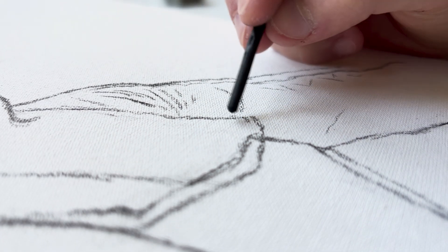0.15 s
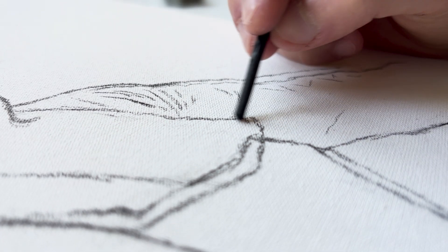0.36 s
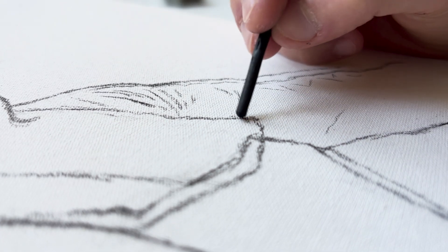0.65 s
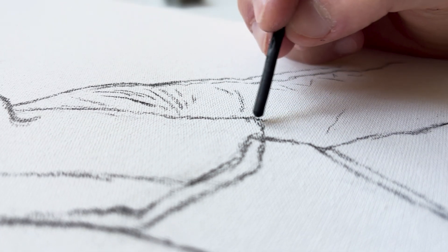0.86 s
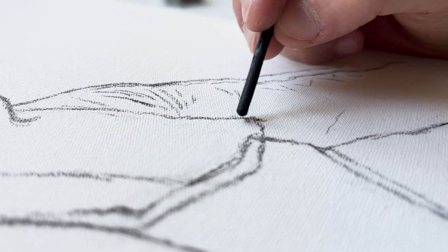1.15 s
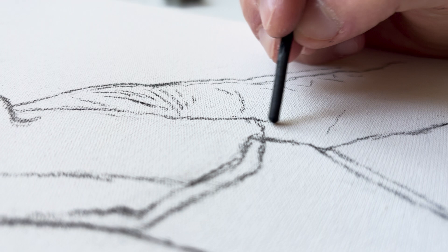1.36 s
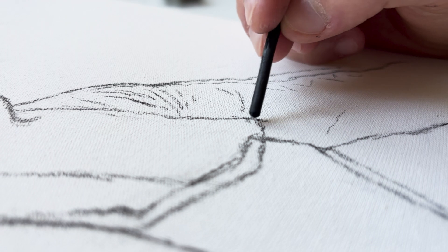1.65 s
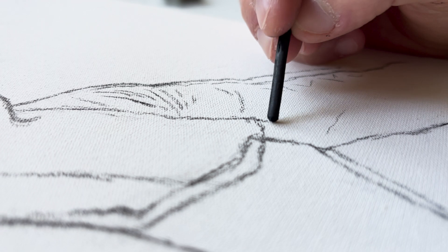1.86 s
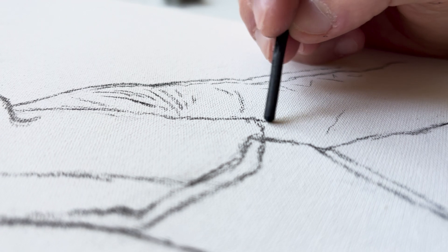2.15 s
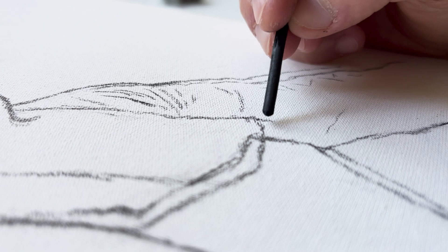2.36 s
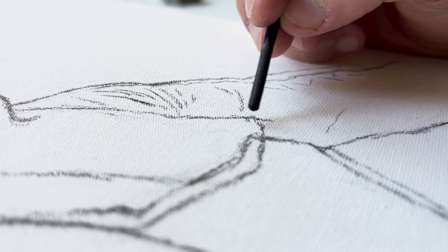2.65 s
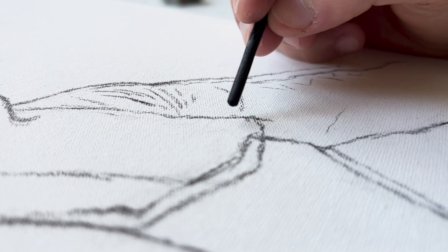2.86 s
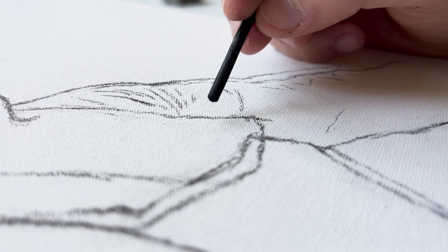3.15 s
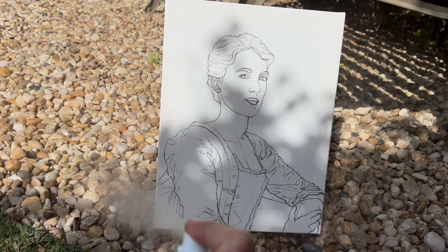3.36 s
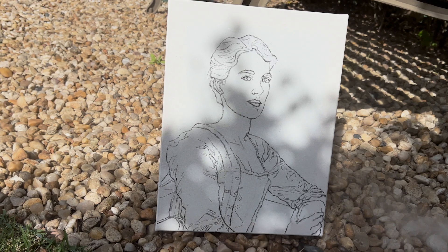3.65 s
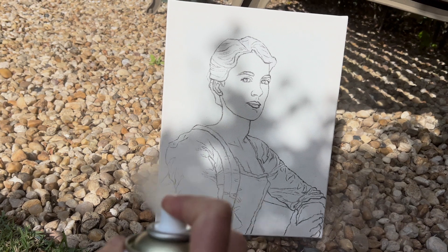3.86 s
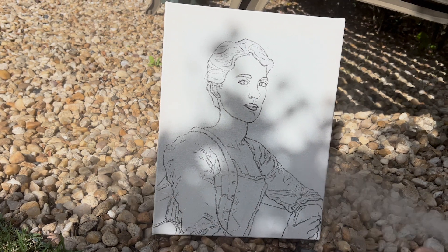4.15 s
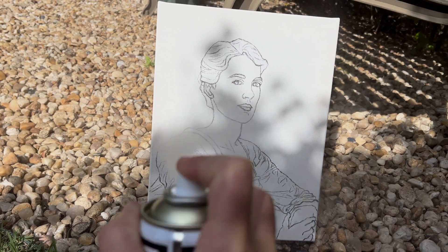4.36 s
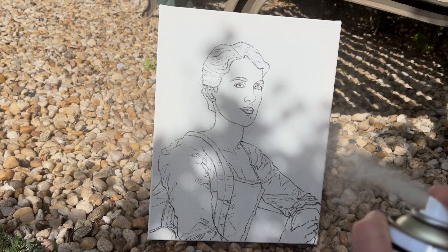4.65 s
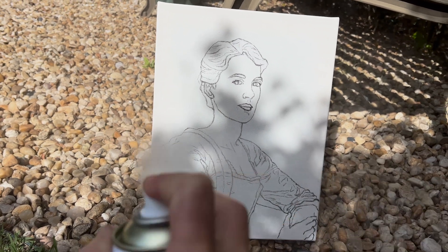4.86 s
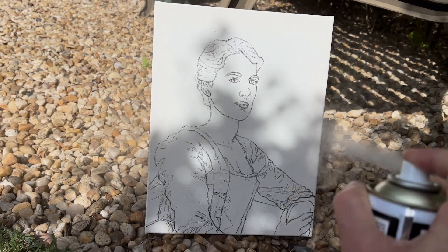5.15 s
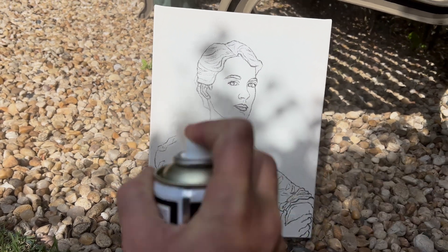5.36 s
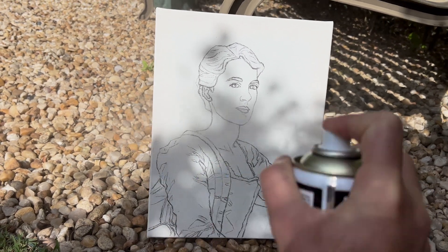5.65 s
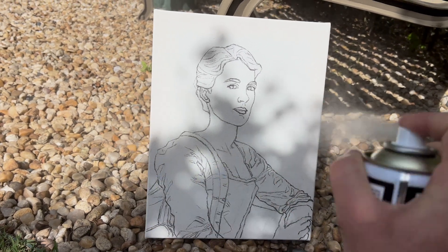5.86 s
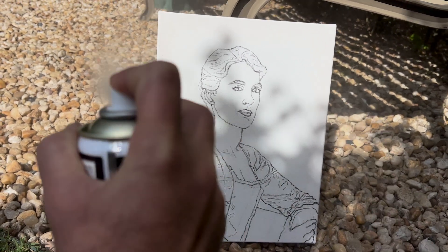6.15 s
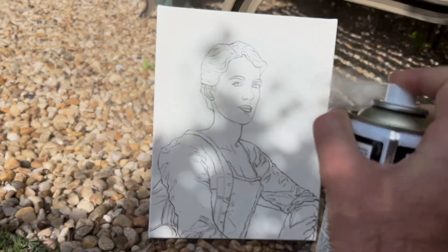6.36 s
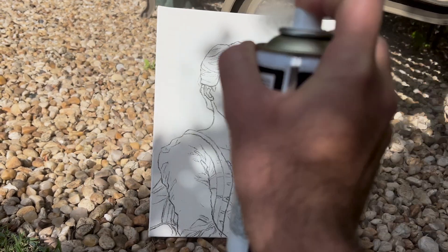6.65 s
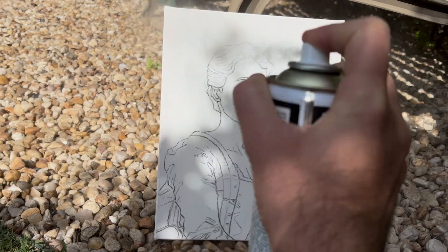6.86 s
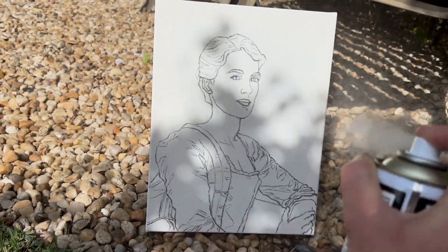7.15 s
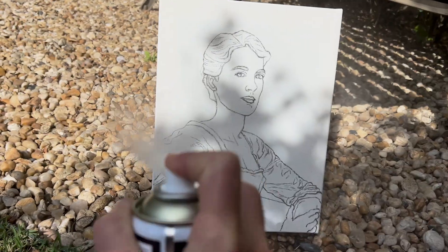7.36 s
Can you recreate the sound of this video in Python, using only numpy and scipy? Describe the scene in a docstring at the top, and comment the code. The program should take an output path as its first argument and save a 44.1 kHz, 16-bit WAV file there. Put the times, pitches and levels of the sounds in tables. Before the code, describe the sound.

From 0 to about 3.1 s we are close to a stretched canvas in a quiet, dull room with a barely audible hum. Charcoal touches at 0.25-0.45 s in quick, gritty little scratches with brittle crumb ticks and soft, low drum-like booms. A longer rub comes at 0.65-0.8 s, then single short taps near 1.35 and 1.83 s and a last pair around 2.15 s; the canvas rings briefly after each. Near-quiet follows, with one tiny tick at 2.5 s. From 3.1 to 3.5 s the room dissolves into a yard with low rumble and faint far drones. An aerosol spray hisses continuously to the end, about 7.6 s, bright and airy, swishing with each sweep roughly twice a second, surging to the left, flashing with crisp sizzle, thinning near 3.6 and 7.05 s, and gradually becoming nearer and louder.

```python
"""Charcoal on canvas, then a spray can

A charcoal stick scratches short strokes on a stretched canvas, which booms like a soft drum, in a quiet room.
The scene dissolves to a yard, where an aerosol can sweeps from side to side with a bright, swishing hiss.
Jet and friction are shaped noise; canvas and crumbs ring as damped tones. The jet's near reflection swishes.
Behind them lie dull room air and a faint hum, then an outdoor rumble with far drones.
"""
import sys
import numpy as np
from scipy import signal
from scipy.fft import rfft, irfft, next_fast_len
from scipy.io import wavfile
from scipy.ndimage import map_coordinates

SR = 44100
rng = np.random.default_rng(int(sys.argv[2]) if len(sys.argv) > 2 else 0)


def put_to_file(sound):
    """Save the sound as 16-bit audio at rate SR, in the file named by the first command-line argument."""
    columns = np.atleast_2d(sound).T  # one column per channel
    safe = np.clip(columns, -1, 1)
    whole_steps = np.round(safe * 32767)
    wavfile.write(sys.argv[1], SR, whole_steps.astype(np.int16))


N = 331632
TIME = np.arange(N) / SR   # s
DISSOLVE_S, DISSOLVE_LENGTH_S = 3.1, .42   # start and length of the change from room to yard
PORT_LAG_MS = .15   # time between the microphone's two ports
# long waves bend round hand and can and are hardly reflected
UNREFLECTED_HZ, UNREFLECTED_DB = (30, 2300), -12


# the can works its way closer: (time [s], level change [dB])
NEARNESS = [(3.4, -2), (4.25, -2), (5.2, 1), (6.3, 1.5), (6.95, 3), (7.2, 3), (7.5, 4.5)]
# the treble beam flashes past: (middle [s], half length [s], gain before each layer takes its share [dB])
FLASHES = [(3.41, .035, -1.5), (3.503, .028, 0), (3.78, .04, 3), (4.017, .055, 3.5), (4.29, .025, 2),
           (4.385, .045, 6), (4.608, .045, 6), (4.907, .07, 4.5), (5.105, .075, 6), (5.41, .035, 6),
           (5.685, .07, 6.3), (6.045, .03, 3.5), (6.374, .08, 5.4), (6.594, .05, 1), (7.09, .04, -3),
           (7.29, .055, 6.5)]
# the arm reaches wide to the right and the jet loses its midrange:
# (middle [s], half length [s], loss [dB])
WIDE_REACHES = [(3.606, 0.097, 6.5), (7.048, 0.081, 7.5)]


def spray():
    """Turbulent jet: rush, hiss, surge, whistle and sizzle, sputtering together as droplets pass."""
    near_db = np.interp(TIME, *np.transpose(NEARNESS))
    leftward, speed = arm(), pace()
    aside, rush_gain_db, hiss_gain_db, surge_db, side_db = swings()
    tremor_db = 1.27 * drift(31)
    aim_db = sum(db * bell(s, half) for s, half, db in FLASHES) + tremor_db
    path_ms = reflection_path()

    body = rush(near_db, aside, rush_gain_db, side_db)
    body = body + hiss(near_db, aim_db, leftward, hiss_gain_db, side_db)
    body = body + from_db(near_db + surge_db) * surge(aside, speed)
    body = moving_dip(body, speed, near_db)
    reach_db = sum(db * bell(s, half) for s, half, db in WIDE_REACHES)
    body = emphasis(body, (1040, 5850), -reach_db)
    body = scattered(body, leftward, strength=.14)

    # the top treble reaches the right channel first
    top = sizzle(near_db, aim_db, aside) + whistle(near_db, aim_db, aside, side_db)
    beam = ports(top, top, -PORT_LAG_MS) + diffuse_sizzle(near_db)

    jet = reflected(body + beam, path_ms, strength=.38)
    jet = restless(jet, patchy_db=1.7, patch_hz=330, patch_s=.11)
    sputter_db = 0.64 * drift(400)
    return jet * from_db(sputter_db)


# colour of the rush: (frequency [Hz], relative level [dB])
RUSH_COLOUR = [(200, 0.5), (450, -8), (800, -5), (1100, 1), (1550, 3), (2050, 0.5), (2400, 4.5),
               (2680, 6.5), (3000, -3.5), (3500, -1), (4500, -0.5), (6500, 4.5), (7200, 2.5), (7900, 8),
               (8400, -4), (9200, -38)]
# how alike left and right are in rush and hiss: (frequency [Hz], likeness [-1 to 1])
JET_LIKENESS = [(450, 0.88), (1150, 0.77), (1800, 0.24), (2700, 1), (3500, 0.29), (4500, 0.46),
                (5600, 0.15), (7500, 0.77), (9000, 0.022)]


def rush(near_db, aside, gain_db, side_db):
    """The jet's broad noise, fuller around 2.3 to 3.5 kHz, comes first on the left when the can is there."""
    ring_hz, ring_db = (2330, 3470), 2.5 - 0.5 * aside
    noise = emphasis(colour(white(), RUSH_COLOUR, JET_LIKENESS), ring_hz, ring_db)
    level_db = -42 + 0.8 * near_db + gain_db
    return from_db(level_db) * ports(*noise, PORT_LAG_MS * aside) * pan(0.74 * side_db)


# colour of the hiss: (frequency [Hz], relative level [dB])
HISS_COLOUR = [(3000, -9.5), (3600, -0.5), (3900, -0.5), (4400, 2), (4850, 6.5), (5250, 3), (5470, 3),
               (5720, 0.5), (6200, 3), (6550, 3.5), (7100, -1), (7900, -9), (8500, 3.5), (9500, -80)]


def hiss(near_db, aim_db, leftward, gain_db, side_db):
    """The nozzle's turbulent hiss strengthens with nearness, with aim and as the arm moves left."""
    noise = colour(white(), HISS_COLOUR, JET_LIKENESS)
    level_db = -46 + near_db + 0.78 * aim_db + 2.5 * leftward + gain_db
    return from_db(level_db) * noise * pan(1.36 * side_db)


# colour of the surging hiss: (frequency [Hz], relative level [dB])
SURGE_COLOUR = [(3000, -11), (3800, -4.5), (4600, 2.5), (5750, 2.5), (6400, -5.5), (7300, -12),
                (7950, -2.5), (8500, -31), (9500, -52)]


def surge(aside, speed):
    """While the can is to the left an extra hiss swells, its pitch dipping as the arm turns."""
    noise = colour(rng.standard_normal(N), SURGE_COLOUR)
    noise = rms_one(swept(noise, 5150 + 750 * speed, width_hz=800, gain_db=5))
    return from_db(-43.5) * aside * noise * pan(13)


def moving_dip(x, speed, near_db):
    """A dip in the jet lies lowest when the arm turns, climbs in mid-sweep and climbs less when near."""
    unsteady_db = 2.5
    climb = speed * from_db(-1.5 * near_db + unsteady_db * drift(9))
    depth_db = -9 + unsteady_db * drift(12)
    return swept(x, 3230 + 610 * climb, width_hz=237, gain_db=depth_db)


# level of the sizzle between flashes, and the share of the nearness swing that it takes
SIZZLE_DB, SIZZLE_FOLLOWS = -31, 0.55
# colour of the sizzle: (frequency [Hz], relative level [dB])
SIZZLE_COLOUR = [(7000, -25), (8400, -10), (9000, -2.5), (10300, -3), (11300, -1), (13000, 0), (13900, -.5),
                 (15600, 2.5), (17000, 1)]


def sizzle(near_db, aim_db, aside):
    """The top treble leaves in a narrow beam, while its lower part spreads wide and flashes less."""
    low_hz, low_db = (9100, 10700), -3.5 * aside - 0.88 * aim_db
    noise = emphasis(colour(rng.standard_normal(N), SIZZLE_COLOUR), low_hz, low_db)
    turned_away_db = 2.5 * aside
    return from_db(SIZZLE_DB + SIZZLE_FOLLOWS * near_db + aim_db - turned_away_db) * noise


# colour of the sizzle from all round: (frequency [Hz], relative level [dB])
DIFFUSE_COLOUR = [(10000, -40), (11300, 0), (15600, 0)]


def diffuse_sizzle(near_db):
    """A little of the sizzle comes back from all round the yard, independent on left and right."""
    return from_db(SIZZLE_DB + SIZZLE_FOLLOWS * near_db - 14) * colour(white(), DIFFUSE_COLOUR)


# the whistling top of the nozzle's cavity: (frequency [Hz], relative level [dB])
WHISTLE_COLOUR = [(10000, -30), (11300, -8), (12000, 0), (12500, -2), (12900, -11), (14000, -30)]


def whistle(near_db, aim_db, aside, side_db):
    """The nozzle's cavity whistles, louder and higher when the can swings to the side."""
    level_db = -45 + 0.65 * near_db + 0.12 * aim_db + 0.58 * side_db
    noise = from_db(level_db) * colour(rng.standard_normal(N), WHISTLE_COLOUR)
    return swept(noise, 11400 + 650 * aside, width_hz=280, gain_db=5)


# the can passes to the left and back: (out [s], back [s], rush gain [dB], hiss gain [dB],
# surge level change [dB], left-right difference before each layer takes its share [dB])
SWINGS = [(3.246, 3.358, -0.5, -5.5, -6, 10), (3.827, 3.967, 1.5, -3.5, -4.5, 4),
          (4.336, 4.5, 0, -13, -4, 8), (4.823, 4.992, -1.5, -8.5, -1.5, 8), (5.336, 5.575, -1.5, -5, -2, 5),
          (5.998, 6.243, 0, -4.5, 0.5, 4.5), (6.696, 6.8, 2, -3, -10, 1), (7.268, 7.402, 2, -16.5, -7, 6.5)]


def swings(edge_s=0.075, rest_pan_db=1.2):
    """While the can is to the left, the jet leans that way and surges."""
    aside = np.array([plateau(out, back, edge_s) for out, back, *_ in SWINGS])
    rush_db, hiss_db, surge_db, pan_db = np.transpose(SWINGS)[-4:] @ aside
    return aside.sum(axis=0), rush_db, hiss_db, surge_db, rest_pan_db + pan_db


# turning points of the arm's sweep: (time [s], position [0 far right to 1 far left])
ARM_TURNS = [(3.3, .6), (3.62, 0), (3.92, .7), (4.15, .15), (4.42, 1), (4.68, .45), (4.93, 1), (5.17, .5),
             (5.46, 1), (5.78, .45), (6.12, 1), (6.45, .7), (6.76, 1), (7.0, .1), (7.37, .95), (7.62, .4)]


def arm():
    """The arm's position, easing into each turning point."""
    s, position = np.transpose(ARM_TURNS)
    steps = np.arange(len(s))
    leg, part = np.divmod(np.interp(TIME, s, steps), 1)
    eased = (1 - np.cos(np.pi * part)) / 2
    return np.interp(leg + eased, steps, position)


def pace():
    """The arm's relative speed: 0 at each turning point, 1 in mid-sweep."""
    s = np.transpose(ARM_TURNS)[0]
    return np.sin(np.pi * np.interp(TIME, s, np.arange(len(s)))) ** 2


def reflection_path():
    """The reflection's extra path [ms] grows as the arm goes left and trembles with the unsteady hand."""
    return 1.85 + .33 * arm() + .015 * drift(11)


def reflected(x, path_ms, strength):
    """A near reflection whose path changes with every sweep: a moving comb that swishes."""
    treble = emphasis(x, UNREFLECTED_HZ, UNREFLECTED_DB)
    return x + strength * np.array([delayed(channel, path_ms) for channel in treble])


def scattered(x, leftward, strength, stretch=0.148, wander_ms=0.013, count=5):
    """Faint echoes off hand, can and ground, other ones on each side, stretch as the arm moves left."""
    out, treble = x.copy(), emphasis(x, UNREFLECTED_HZ, UNREFLECTED_DB)
    for side, paths_ms in enumerate(rng.uniform(.4, 3, (2, count))):
        for path_ms in paths_ms:
            delay_ms = path_ms * (1 + stretch * leftward) + wander_ms * drift(5)
            out[side] += strength * np.interp(TIME - delay_ms / 1000, TIME, treble[side])
    return out


# strokes; where the tip sits picks the modes that boom. The three times are played in rising order.
# (touch [s], hardest [s], lift [s], touch level [relative dB], hardest level [relative dB], unused [dB],
# boom over scratch [relative dB], strongest boom [Hz], fall to either side [dB per octave])
STROKES = [(0.246, 0.273, 0.3, -61, -56, 4, 17.5, 260, 2), (0.307, 0.36, 0.338, -77, -71.5, -3, 38, 121, 3),
           (0.349, 0.383, 0.433, -63, -47, -3, 14, 83.5, 1),
           (0.467, 0.49, 0.487, -62.5, -65, 2, 27.5, 238, 9),
           (0.653, 0.723, 0.815, -61, -53, -6, 11, 200, -0.5),
           (1.329, 1.345, 1.357, -54.5, -52.5, 0, 7.5, 245, 0),
           (1.819, 1.83, 1.864, -60, -53.5, 0, 15, 241, 1),
           (2.115, 2.17, 2.14, -62, -51.5, -2, 12.5, 230, 5),
           (2.172, 2.187, 2.22, -67, -60.5, 0, 30.5, 237, 17)]


def pressures(bite_s=0.0064, release_s=0.029, lift_drop_db=11):
    """Friction of each stroke: it bites quickly, swells and eases off."""
    rows = []
    for touch, hardest, lift, touch_db, hardest_db, *_ in STROKES:
        times = np.sort([touch - bite_s, touch, hardest, lift, lift + release_s])
        levels = from_db([touch_db, hardest_db, hardest_db - lift_drop_db])
        rows.append(np.interp(TIME, times, [0, *levels, 0]))
    return np.array(rows)


# colour of the scratch: (frequency [Hz], relative level [dB])
SCRATCH_COLOUR = [(200, 16.5), (450, -13), (800, 9.5), (1100, -1.5), (1600, 6.5), (2100, 6.5), (2600, 0.5),
                  (3200, -5), (4800, 5), (5900, -0.5), (7000, -6.5), (8000, 3), (8900, -19.5),
                  (11500, -8.5), (15700, -5)]
# how alike left and right are in the scratch: (frequency [Hz], likeness [-1 to 1])
SCRATCH_LIKENESS = [(300, -0.56), (700, 0.99), (2000, 0.99), (5000, -0.75), (8000, 0.5), (11000, 0.11)]


def scratch(pressure, threads_per_s=900, bumps_per_s=90):
    """The tip catches on the weave thread by thread, so its friction noise comes in grains."""
    grain_db, uneven_db = 2 * drift(threads_per_s), 2 * drift(bumps_per_s)
    catches = rms_one(from_db(grain_db + uneven_db))
    friction = colour(white() * catches, SCRATCH_COLOUR, SCRATCH_LIKENESS)
    # the worn tip meets the cloth at ever new angles
    friction = restless(friction, patchy_db=2.2, patch_hz=500, patch_s=.09)
    return from_db(-1) * pressure.sum(axis=0) * friction * pan(5)


# snapping crumbs of charcoal: (time [s], starting level of the tick [relative dB], pitch [Hz])
CRUMBS = [(0.167, -52.5, 5300), (0.254, -42, 1640), (0.296, -52, 4500), (0.343, -46, 3600),
          (0.371, -55, 1710), (0.434, -50, 4800), (0.466, -56, 1500), (0.483, -54, 4800),
          (0.664, -51, 1650), (0.75, -46, 4800), (0.806, -60, 4800), (1.335, -53, 1370),
          (1.355, -40.5, 1500), (1.83, -46, 1730), (2.162, -38.5, 1900), (2.512, -64, 5200)]


def crumbs(t60=0.0029, crack=0.22, crack_cycles=2.5):
    """A snapping crumb makes the stick tick, with a broad crack around the same pitch."""
    out = np.zeros(N)
    age = TIME[:SR // 20]
    for s, db, hz in CRUMBS:
        at = round(s * SR)
        tone = np.sin(2 * np.pi * hz * age)
        burst = rms_one(ring(rng.standard_normal(len(age)), hz, crack_cycles / hz))
        out[at:at + len(age)] += from_db(db - 60 * age / t60) * (tone + crack * burst)
    return out * pan(3)


def studio(x, late, late_t60, early=1.0, early_t60=0.025, wall_hz=5000):
    """Close surfaces colour the sound and the walls add a short, dull tail."""
    t = TIME[:SR // 3]
    response = np.zeros((2, len(t)))
    response[:, 0] = 1   # the direct sound
    wall_dull = np.exp(-2 * np.pi * wall_hz / SR)
    for share, t60, dull in ((early, early_t60, 0), (late, late_t60, wall_dull)):
        echoes = rng.standard_normal(response.shape) * from_db(-60 * t / t60) * (t > .001)
        echoes = echoes / np.linalg.norm(echoes, axis=1, keepdims=True)
        response += share * signal.lfilter([1 - dull], [1, -dull], echoes)
    return signal.fftconvolve(x, response, axes=1)[:, :N]


# modes of the stretched canvas: (frequency [Hz], relative level [dB], time to fall 60 dB [s])
CANVAS_MODES = [(66.34, 0.5, .75), (103, 2, .34), (142.4, 2, .54), (189, -0.5, .32), (209.6, -4.5, .25),
                (254.8, -5.5, .26), (286, -12.5, .17), (314, -7, .14), (368.7, -11.5, .5), (419, -13, .3),
                (565, -20, .12)]
# how alike left and right are in canvas and air: (frequency [Hz], likeness [-1 to 1])
AIR_LIKENESS = [(60, 1), (140, 0.88), (280, 0.62), (550, 0), (3000, 0.11), (15000, 0.043)]


def boom(pressure):
    """Each stroke's pressure shakes the canvas, whose modes ring on after the tip lifts."""
    boom_db, centre_hz, fall_db = np.transpose(STROKES)[-3:]
    flat = [(20, 0), (20000, 0)]
    shake, out = colour(white(), flat, AIR_LIKENESS), 0
    for hz, db, t60 in CANVAS_MODES:
        force = from_db(boom_db - fall_db * np.abs(np.log2(hz / centre_hz))) @ pressure
        # evens out the build-up of long-ringing modes
        unit_gain = np.sqrt(4 * np.log(1000) / (t60 * SR))
        out = out + from_db(db - 7) * unit_gain * ring(force * shake, hz, t60)
    return out * pan(1)


# the tip presses into the cloth or lets it spring back:
# (time [s], strength [relative dB], strongest mode [Hz])
THUMPS = [(0.26, -41, 350), (0.282, -42, 340), (0.303, -42, 145), (0.352, -38, 106), (0.384, -35, 82.6),
          (0.684, -42, 370), (0.75, -46, 200), (0.795, -39, 336), (0.851, -44, 142), (1.357, -42.5, 247),
          (1.876, -40, 282), (1.981, -51.5, 109), (2.151, -40.5, 260), (2.18, -38.5, 240)]


def thumps(contact_hz=600, fall_db_per_octave=9.5):
    """A sudden change of pressure sets the canvas ringing like a soft drum."""
    s, thump_db, centre_hz = np.transpose(THUMPS)
    out = 0
    for k, (hz, db, t60) in enumerate(CANVAS_MODES):
        pushes = np.zeros(N)
        push_db = thump_db + db - fall_db_per_octave * np.abs(np.log2(hz / centre_hz))
        pushes[np.round(s * SR).astype(int)] = from_db(push_db)
        out = out + (-1) ** k * ring(pushes, hz, t60)   # neighbouring modes start in opposite directions
    soft_contact = signal.butter(2, contact_hz, fs=SR, output="sos")
    return signal.sosfilt(soft_contact, out) * pan(1)


# the hand shifts lightly on the cloth:
# (middle [s], half length [s], centre [Hz], width [Hz], peak level [dB])
SHIFTS = [(0.2, 0.055, 5500, 500, -85), (1.77, 0.043, 810, 160, -70), (1.985, 0.088, 5560, 400, -87)]


def shifts():
    """Skin brushing the cloth: faint, narrow swells of friction noise."""
    out = 0
    for middle, half, hz, width_hz, db in SHIFTS:
        rub = rms_one(ring(rng.standard_normal(N), hz, 2 / width_hz))
        out = out + from_db(db) * bell(middle, half) * rub
    return out


# colour of the outdoor rumble: (frequency [Hz], relative level [dB])
YARD_COLOUR = [(20, -36), (30, -14), (38, -3.5), (50, -21), (60, 3), (75, -4), (105, -4.5), (170, -10),
               (260, -14), (400, -22), (800, -21), (3000, -87)]
# far drones, as of traffic: (start [s], end [s], pitch [Hz], level before wavering and panning [dB])
DRONES = [(3.2, 3.91, 152, -52.5), (3.4, 4.7, 211, -52), (4.87, 7.3, 210, -58.5), (3.8, 5.7, 140, -56),
          (4.78, 5.14, 140, -42), (4.43, 4.85, 100, -42), (3.97, 5.4, 53, -47.5), (3.25, 3.97, 105, -50),
          (5.15, 5.75, 67, -50), (6.42, 7.7, 50, -43)]


def yard(fade_s=0.14, rise_db_per_s=0.66):
    """Outdoor rumble whose deepest part slowly grows, with far drones swelling and fading."""
    growth_db = rise_db_per_s * (TIME - DISSOLVE_S)
    rumble = colour(white(), YARD_COLOUR, AIR_LIKENESS)
    out = from_db(-43) * emphasis(rumble, (25, 104), growth_db)
    for start, end, hz, db in DRONES:
        swell = np.clip(np.minimum(TIME - start, end - TIME) / fade_s, 0, 1)
        out = out + from_db(db) * swell * hum(hz, waver_db=3, wander=.65, wander_rate=20)
    return out * pan(0.67)


# colour of the room's air: (frequency [Hz], relative level [dB])
ROOM_COLOUR = [(20, -35), (35, -15), (50, -0.5), (106, -5), (160, -5), (202, -12.5), (330, -14),
               (462, -22.5), (900, -27), (1630, -36), (3500, -51), (5500, -52), (9000, -59.5), (11000, -74),
               (11750, -46), (12500, -56), (15500, -57)]
# tones of the appliance hum: (pitch [Hz], level before wavering [dB])
ROOM_HUM = [(64.6, -67), (102.3, -59), (156.1, -61), (231.5, -75.5), (365, -78), (558, -81)]


def room():
    """Dull indoor air noise with the wavering tones of a faint appliance hum."""
    tones = sum(from_db(db) * hum(hz, waver_db=2.5, wander=.8, wander_rate=18) for hz, db in ROOM_HUM)
    return from_db(-52) * colour(white(), ROOM_COLOUR, AIR_LIKENESS) + tones


def hum(hz, waver_db, wander, wander_rate):
    """A tone that wavers in level and phase; wander is the phase spread in radians."""
    phase = 2 * np.pi * hz * TIME + wander * drift(wander_rate)
    return np.sqrt(2) * np.sin(phase) * from_db(waver_db * drift(5.4))


def from_db(db):
    """Decibels to an amplitude factor."""
    return 10 ** (np.asarray(db) / 20)


def rms_one(x):
    """Scales a sound to an average (rms) strength of 1."""
    return x / np.sqrt(np.mean(x ** 2) + 1e-20)


def white():
    """Two independent rows of white noise."""
    return rng.standard_normal((2, N))


def drift(rate):
    """Smooth chance with spread 1, changing about rate times a second."""
    knots = rng.standard_normal(N // 8)
    return rms_one(np.interp(TIME * rate, np.arange(len(knots)), knots))


def bell(middle, half):
    """A smooth swell of height 1."""
    return np.exp(-((TIME - middle) / half) ** 2)


def plateau(start, end, edge_s):
    """Rises around the start and falls back around the end, reaching 1 if there is time."""
    return np.clip(np.minimum(TIME - start, end - TIME) / edge_s + .5, 0, 1)


def at_hz(points, hz):
    """A spectrum read on a log-frequency axis."""
    knots, values = np.transpose(points)
    return np.interp(np.log(hz + 1e-3), np.log(knots), values)


def colour(x, spectrum, likeness=None):
    """Shapes white sound to rms 1; with a likeness, its two rows become left and right."""
    size = next_fast_len(N)
    hz = np.arange(size // 2 + 1) * SR / size
    bins = rfft(x, size) * from_db(at_hz(spectrum, hz))
    if likeness is not None:
        alike = np.clip(at_hz(likeness, hz), -1, 1)
        mid, side = np.sqrt(1 + alike) * bins[0], np.sqrt(1 - alike) * bins[1]
        bins = np.array([mid + side, mid - side])
    return rms_one(irfft(bins, size)[..., :N])


def emphasis(x, band_hz, db):
    """Raises or lowers one band by a fixed or changing amount."""
    band = signal.sosfiltfilt(signal.butter(2, band_hz, "band", fs=SR, output="sos"), x)
    return x + (from_db(db) - 1) * band


def swept(x, centre_hz, width_hz, gain_db, size=512):
    """A resonance (or, with a negative gain, a dip) whose centre and strength can move."""
    hz, s, bins = signal.stft(x, SR, nperseg=size)
    centre, db = (np.interp(s, TIME, curve + np.zeros(N)) for curve in (centre_hz, gain_db))
    shape = np.exp(-((hz[:, None] - centre) / width_hz) ** 2)
    return signal.istft(bins * from_db(db * shape), SR, nperseg=size)[1][..., :N]


def restless(x, patchy_db, patch_hz, patch_s, size=512):
    """The colour of a noise wanders: neighbouring frequencies swell and sink together."""
    hz, s, bins = signal.stft(x, SR, nperseg=size)
    knots = rng.standard_normal((int(hz[-1] / patch_hz) + 2, int(s[-1] / patch_s) + 2))
    grid = np.meshgrid(hz / patch_hz, s / patch_s, indexing="ij")
    patches = map_coordinates(knots, grid, order=3)
    return signal.istft(bins * from_db(patchy_db * patches), SR, nperseg=size)[1][..., :N]


def ring(x, hz, t60):
    """A damped mode: each click makes it ring at hz and fall 60 dB in t60 seconds."""
    r, w = from_db(-60 / (t60 * SR)), 2 * np.pi * hz / SR
    return signal.lfilter([0, np.sin(w)], [1, -2 * r * np.cos(w), r * r], x + 1e-18)


def delayed(x, ms):
    """One channel, later by a fixed or moving delay."""
    return map_coordinates(x, [np.arange(N) - ms * SR / 1000], order=3)


def ports(left, right, lead_ms):
    """The left channel comes earlier than the right one, or later if the lead is negative."""
    return np.array([delayed(left, -lead_ms / 2), delayed(right, lead_ms / 2)])


def pan(db):
    """Left and right gains for a level difference; positive leans left."""
    return from_db(np.array([[.5], [-.5]]) * db)


def scene():
    """The drawing indoors dissolves into the spraying outdoors."""
    pressure = pressures()
    tip = studio(scratch(pressure) + crumbs(), late=.26, late_t60=.27)
    indoors = tip + boom(pressure) + thumps() + shifts() + room()
    outside = np.clip((TIME - DISSOLVE_S) / DISSOLVE_LENGTH_S, 0, 1)
    spray_fade = np.clip((TIME - DISSOLVE_S) / 0.36, 0, 1) ** 1.26
    return spray_fade * spray() + np.sqrt(1 - outside) * indoors + np.sqrt(outside) * yard()


def record(dry):
    """The top is cut steeply above 15.7 kHz."""
    return signal.sosfilt(signal.ellip(12, .1, 80, 15700, fs=SR, output="sos"), dry)


dry = scene()
out = record(dry)
put_to_file(out)
```